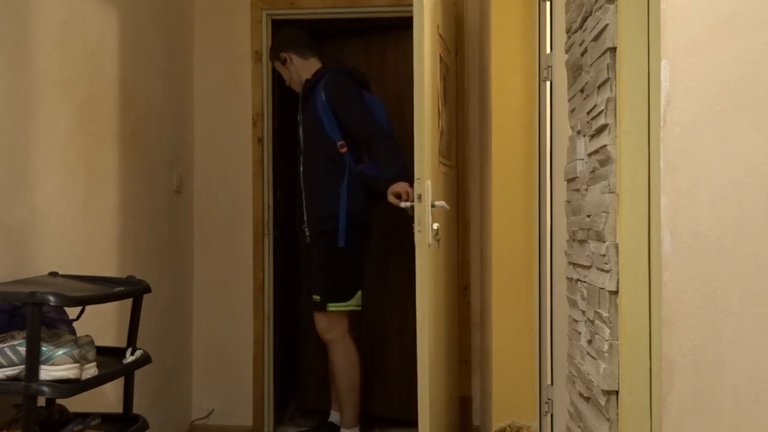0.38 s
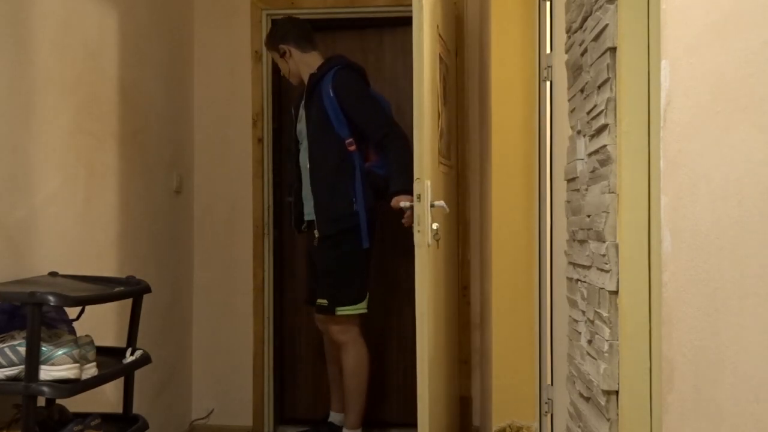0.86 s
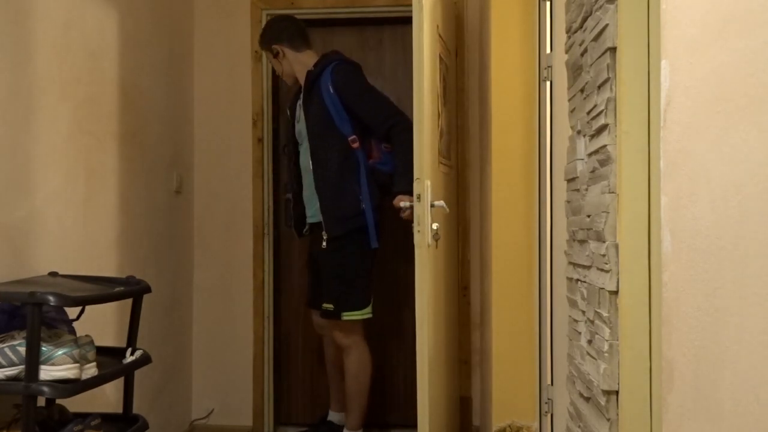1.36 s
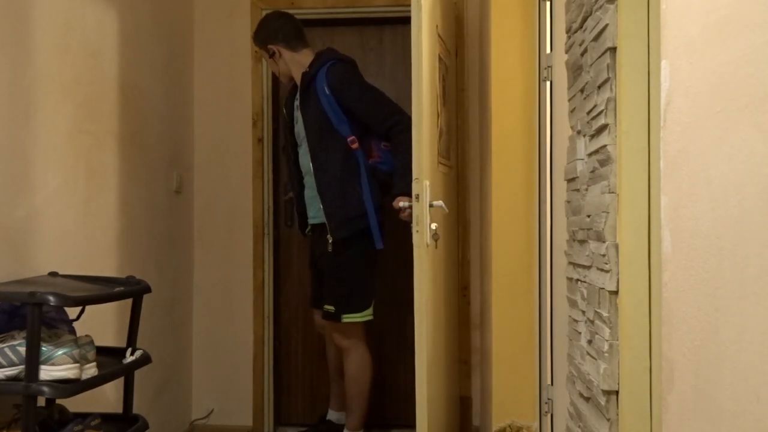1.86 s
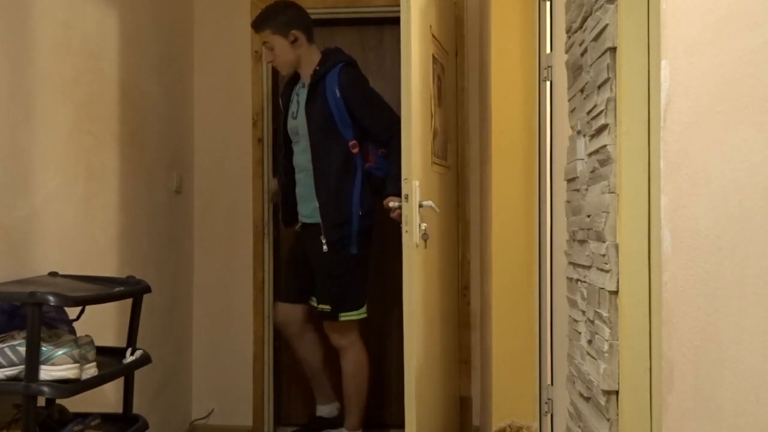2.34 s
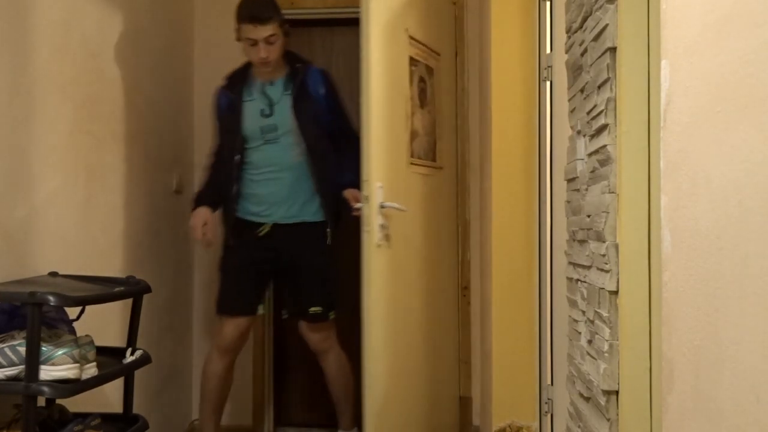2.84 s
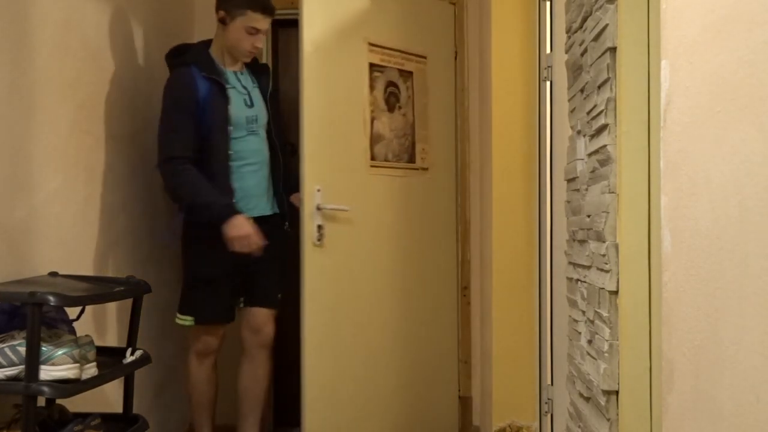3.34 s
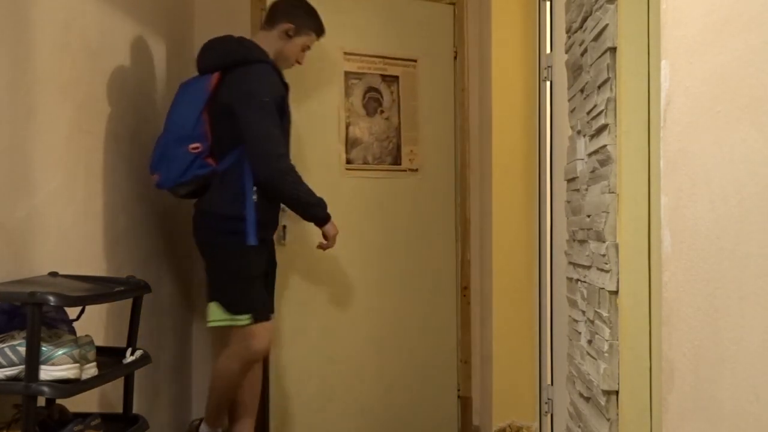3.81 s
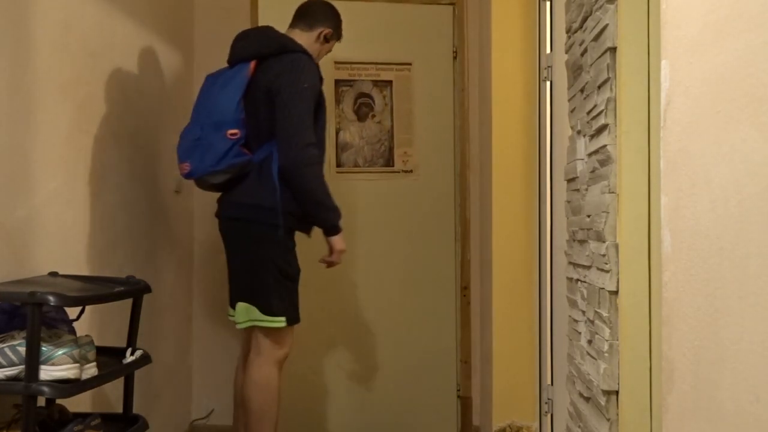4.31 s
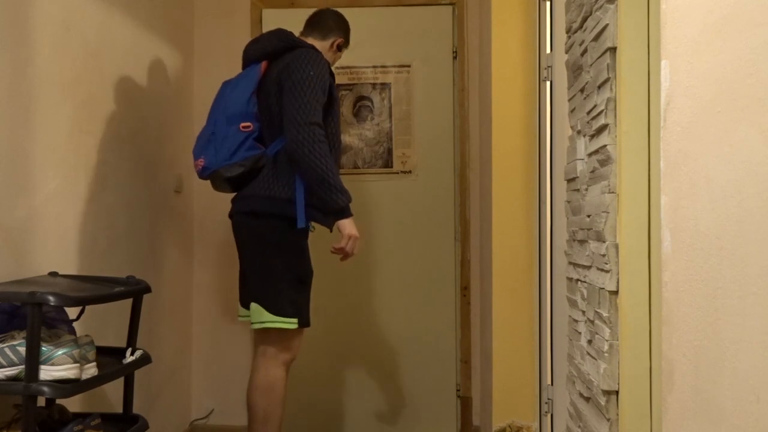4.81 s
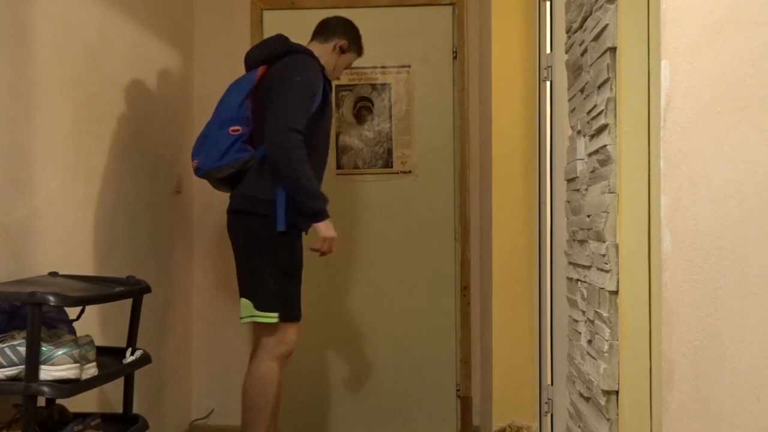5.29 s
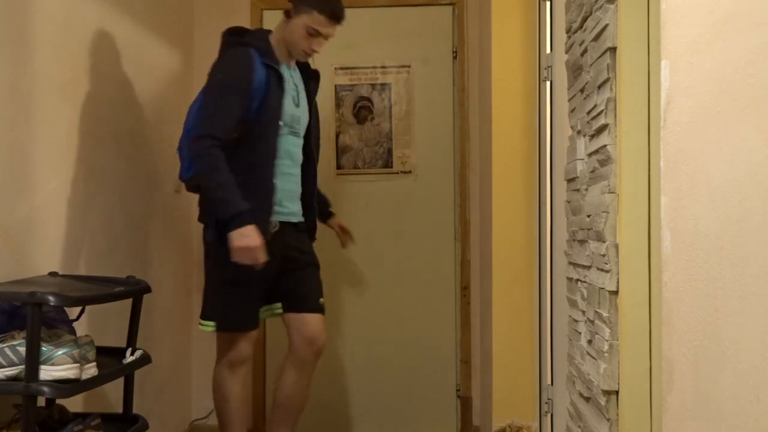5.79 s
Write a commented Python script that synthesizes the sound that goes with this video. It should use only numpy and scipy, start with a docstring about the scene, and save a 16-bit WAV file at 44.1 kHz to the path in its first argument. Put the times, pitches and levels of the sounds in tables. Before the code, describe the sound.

Someone enters through a door: soft handle clicks, one sharp metallic knock, cloth rustle, a duller closing thump, then small clicks and footfalls.

```python
"""Latch, handle and shoes knock in short rattles of tiny contacts, as someone steps into a hard-walled
entrance hall, works the handle and lock, and shuts the door. Metal drags ring the lock plate, a zip
tag tinkles as a struck set of modes, and wood groans as friction noise feeding a resonance.
Footfalls thud in the low modes of the hall, cloth and soles rustle as shaped noise over a smooth
hush, and dense decaying reflections smear the hits into a tail of up to half a second."""
import sys
import numpy as np
from scipy import signal
from scipy.io import wavfile

SR = 44100
rng = np.random.default_rng(int(sys.argv[2]) if len(sys.argv) > 2 else 0)


def amplitude_ratio(level_db):
    """Convert a level in decibels to the matching linear amplitude (field) ratio."""
    exponent = np.asarray(level_db, float) / 20
    return 10 ** exponent


def master_out(mix):
    """Clip the mix to full scale and print it as 16-bit PCM to the path in sys.argv[1]."""
    frames = np.transpose(np.atleast_2d(mix))
    ceiling = np.clip(frames, -1, 1)
    pcm = np.round(ceiling * 32767).astype(np.int16)
    wavfile.write(sys.argv[1], SR, pcm)


N = 261072

# half-octave band edges of the stereo noise: edge_hz
BAND_EDGES_HZ = 50 * 2 ** np.arange(0, 8.1, .5)
# reverberation time of the hall: frequency_hz, t60_s
HALL_T60 = [(150, 0.47), (400, 0.42), (1040, 0.54), (2760, 0.23), (7280, 0.3), (11000, 0.23)]
# correlation of left and right in diffuse sound: frequency_hz, likeness (-1 to 1)
LIKENESS = [(60, 0.34), (170, 0.99), (490, 0.9), (1400, 0.78), (4000, 0.4), (11400, -0.28)]
# spectrum of the room's hush: frequency_hz, relative density_db (per Hz)
HUSH_SPECTRUM = [(24, -71), (40, -51), (357, -8), (861, -4.5), (1020, 1), (1350, -2), (2280, 0),
                 (6060, -5.5), (11000, -14), (11800, -25), (15300, -55)]
# spectrum of rubbed cloth: frequency_hz, relative density_db (per Hz)
CLOTH_SPECTRUM = [(88, -40), (150, -11.5), (246, -6.5), (580, -2), (623, -0.5), (966, -3.5), (3410, -1),
                  (5480, -3.5), (6700, -6), (11800, -11), (15300, -57)]
# strokes of cloth, soles and door seal rubbing: start_s, hold_s, level_db, dull_part_relative_db
STROKES = [(0.014, 0.022, -55, -19), (0.062, 0.032, -47.5, 5), (0.16, 0.55, -50, -5),
           (0.793, 0.13, -59.5, -26), (1.583, 0.062, -55, -12), (1.708, 0.11, -38.5, -10),
           (1.789, 0.14, -38.5, -6.5), (2.025, 0.34, -49.5, -1.5), (2.39, 0.32, -54.5, -11),
           (2.865, 0.021, -51.5, -6), (2.959, 0.059, -50, -2.5), (3.12, .13, -56, -11),
           (3.322, .05, -65.5, 10.5), (3.408, 0.59, -55.5, -25), (3.762, 0.16, -51.5, -0.5),
           (4.068, 0.041, -48, -3.5), (4.21, 0.07, -55, -10), (4.336, 0.16, -54, -14),
           (4.476, 0.13, -48.5, -3), (4.69, 0.18, -54.5, 4.5), (5.114, 0.052, -54.5, 8.5),
           (5.296, 0.081, -52, -4.5), (5.517, 0.093, -52.5, -6.5), (5.717, 0.069, -53.5, -39)]
# low modes of hall and floor: name -> frequency_hz, t60_s, build_up_s (as a t60)
LOW_MODES = {"low": (103, 0.3, 0.18), "middle": (141, 0.43, 0.039), "high": (220, 0.3, 0.057)}
# footfalls and door weight in the floor: start_s, peak_db, mode_name, rumble_relative_db
THUDS = [(0.005, -85, "middle", -25), (0.1, -65.5, "high", -15), (0.498, -72, "middle", -10),
         (1.479, -70.5, "low", 2), (1.718, -61, "low", 4), (1.873, -61, "high", 2),
         (2.86, -78.5, "middle", -17), (2.91, -69, "high", -27), (3.724, -63, "middle", -20),
         (3.83, -71, "middle", -22), (3.941, -60, "middle", -15), (4.598, -73.5, "middle", -20),
         (4.739, -73, "middle", -20), (4.852, -64, "middle", -21), (5.124, -60, "middle", -4),
         (5.175, -58, "middle", -22), (5.391, -70, "middle", -16)]
# dull groans of the leaf and floorboards: start_s, level_db, pitch_hz, length_s, ringing_share (ratio)
GROANS = [(0.082, -57, 634, 0.11, 2.7), (0.128, -50, 272, 0.085, 0.37), (0.508, -49, 740, 0.035, 0.099),
          (0.601, -41, 1010, 0.015, 0.16), (1.51, -67, 340, 0.069, 1.6), (1.738, -64, 617, 0.084, .3),
          (1.875, -30, 666, 0.036, 1.5), (2.26, -39, 780, 0.03, 0.1), (2.275, -50, 370, 0.045, 0.1),
          (2.464, -48.5, 660, 0.024, 0.8), (2.56, -53, 723, 0.028, 0.5), (3.34, -64.5, 414, 0.051, 0.46),
          (3.717, -38, 539, 0.034, 0.19), (3.938, -47, 502, 0.024, 0.6), (4.174, -50, 520, 0.039, 0.35),
          (4.482, -50, 573, 0.043, 0.14), (4.595, -42.5, 742, 0.012, 0.69), (4.692, -46, 701, 0.031, 1.4),
          (4.835, -49, 545, 0.02, 0.56), (5.127, -47.5, 1166, 0.035, 0.2), (5.582, -55.5, 460, 0.036, 0.12)]
# modes of the zip tag: frequency_hz, relative level_db, t60_s
ZIP_TAG = [(5560, -6, 0.035), (5690, 0, 0.045), (5810, 3, 0.04), (6010, -5, 0.03)]
# zip tag touching its slider: start_s, relative level_db, top_mode_relative_db
TINKLES = [(3.171, -46, -6), (3.178, -53, 11), (3.197, -58, 2), (3.211, -55, 6), (3.981, -53, -18),
           (3.990, -45.5, -4), (4.001, -53, -10), (4.033, -45, -16), (4.043, -46, -16), (4.053, -49, -16),
           (4.064, -60, -16)]
# modes of the lock plate: frequency_hz, relative level_db, t60_s
LOCK_PLATE = [(1467, -17, 0.075), (1760, -20.5, 0.13), (1819, 6.5, 0.26), (2036, 8.5, 0.043),
              (2246, 2, 0.066), (2430, 13, 0.24), (2740, 6, 0.09), (3190, -6, 0.27)]
# modes of the lock case: frequency_hz, relative level_db, t60_s
LOCK_CASE = [(3854, 0, .012), (5093, -3, .012), (6223, -4, .012), (6900, -6, .012)]
# latch and key dragging over the lock: start_s, length_s, level_db, bright_part_relative_db
DRAGS = [(1.748, 0.035, -45.5, -1), (1.804, 0.044, -41, -1)]
# kinds of touch: name -> rise_s, rattle_time_constant_s, first_contact_share (ratio), grain_spread_db
TOUCHES = {"soft": (0.004, 0.013, 0.2, 4.5), "firm": (0.0028, 0.012, 0.7, 5.2),
           "crisp": (0.0015, 0.007, 1.2, 5)}
# knocks of latch, handle and shoes: start_s, relative level_db, clack_pitch_hz,
# snap_relative_db, hiss_relative_db, touch_name (firm where absent)
KNOCKS = [(0.052, -43, 2420, 2, -2, "soft"), (0.359, -47, 2750, 0, -31), (0.499, -39, 2430, 2.5, -46),
          (0.595, -40.5, 2870, -2, -10), (0.604, -33.5, 2380, -5.5, -17), (0.686, -50, 2470, -11, -22),
          (0.772, -53, 2130, -1, -8), (1.157, -55.5, 2700, -5, -15), (1.263, -55, 3360, -16, -30),
          (1.30, -54, 3400, -14, -30), (1.48, -39, 1920, -3, -17), (1.723, -32.5, 1840, -6, -33),
          (1.861, -36, 2400, -8, -20), (1.8675, -16.5, 1810, 3.5, -2.5, "soft"),
          (1.884, -17, 1980, -34, -1), (1.909, -19.5, 1790, -3, -39), (2.252, -35, 2400, -2.5, -12, "soft"),
          (2.282, -42, 2300, -8, -20), (2.372, -48, 1970, 6, 5), (2.417, -45, 2750, -6, -19, "crisp"),
          (2.861, -49.5, 2040, -3, -13, "soft"), (2.970, -53, 2240, -10, 1.5, "crisp"),
          (3.008, -47, 2000, -10, -23, "soft"), (3.085, -60, 2200, 9, -5, "crisp"),
          (3.0945, -44, 2210, 0, -6, "crisp"), (3.414, -52.5, 2280, -8, -18),
          (3.7105, -25, 1760, -14, -16.5, "soft"), (3.734, -32, 2220, 1, -8, "soft"),
          (3.878, -39.5, 2180, -6.5, -34, "soft"), (3.95, -60, 2250, 4, 10.5, "soft"),
          (4.088, -50, 2620, -7, -26), (4.101, -44.5, 2940, -9, -26), (4.183, -43, 2560, -8, -32),
          (4.488, -47.5, 2900, 2, -12, "soft"), (4.5813, -45, 2060, 0, -19), (4.633, -50, 2360, -24, -24),
          (4.695, -41, 1970, -15, -32, "soft"), (4.7166, -37, 1900, -12.5, -28, "crisp"),
          (4.757, -41, 2150, -22, -30, "crisp"), (4.794, -45, 2160, -22, -29), (4.830, -40, 2940, -1, -7),
          (5.127, -35, 2110, -5, -18, "soft"), (5.245, -45, 2460, -7.5, -22, "soft"),
          (5.319, -41, 2300, -6, -30, "soft"), (5.3245, -29, 2250, -5, -40, "crisp"),
          (5.377, -39.5, 2400, -4, -15), (5.5624, -31, 2530, -5, -18.5)]


def rms_one(x):
    """Normalization: scales a signal to an rms of 1."""
    return x / np.sqrt(np.mean(x ** 2) + 1e-20)


def at_hz(points, hz):
    """Interpolation: reads a table on a log-frequency axis."""
    table = np.array(points)
    return np.interp(np.log(hz), np.log(table[:, 0]), table[:, 1])


def band(x, low_hz, high_hz):
    """Band limitation: a Butterworth band-pass."""
    return signal.sosfilt(signal.butter(2, [low_hz, high_hz], "band", fs=SR, output="sos"), x)


def ring(x, hz, t60):
    """Damped resonance: a unit click sets a decaying sine of starting height 1 ringing."""
    radius, angle = amplitude_ratio(-60 / (t60 * SR)), 2 * np.pi * hz / SR
    return signal.lfilter([0, np.sin(angle)], [1, -2 * radius * np.cos(angle), radius ** 2], x + 1e-18)


def drift(rate_hz):
    """Random modulation: noise through two equal low-pass poles, with an rms of 1."""
    step = 40  # samples between the points of the slow signal
    pole = np.exp(-2 * np.pi * rate_hz * step / SR)
    white = rng.standard_normal(N // step + 502)
    slow = signal.lfilter([1], [1, -2 * pole, pole ** 2], white)[500:]
    return np.interp(np.arange(N) / step, np.arange(len(slow)), rms_one(slow))


def stereo_bands(size):
    """Diffuse-field correlation: half-octave noise whose left-right likeness varies with frequency."""
    white = rng.standard_normal((2, 2, size))
    for k, (low, high) in enumerate(zip(BAND_EDGES_HZ, BAND_EDGES_HZ[1:])):
        mid, side = band(white[k % 2], low, high)
        hz = np.sqrt(low * high)
        alike = np.clip(at_hz(LIKENESS, hz), -.99, .99)
        yield hz, np.sqrt(1 + alike) * mid + np.sqrt(1 - alike) * side * [[1], [-1]]


def struck(contacts, modes, spread_db, detune=0.012):
    """Modal excitation: contacts ring every mode, each with a chance strength and slight detuning."""
    total = 0
    for hz, db, t60 in modes:
        strength = amplitude_ratio(db + spread_db * rng.standard_normal())
        pitch = hz * (1 + detune * rng.standard_normal())
        total = total + strength * ring(contacts, pitch, t60)
    return total


def hall(x, size=30000):
    """Reverberation: dense reflections build up in a few ms and die band by band."""
    t = np.arange(size) / SR
    tail = sum(noise * amplitude_ratio(-60 * t / at_hz(HALL_T60, hz)) for hz, noise in stereo_bands(size))
    tail = tail * (1 - np.exp(-(t / 0.0012) ** 2))
    tail = np.sqrt(2) * tail / np.linalg.norm(tail)
    return signal.fftconvolve(x[None], tail, axes=1)[:, :N]


def rustle_and_hush(size=64):
    """Friction noise: rubbing flickers band by band under swelling strokes, over a smooth room hush."""
    attack_s, release_db_per_s, bright_db, hush_db = 0.03, 89, -5.5, -63
    start, hold, db, dull_db = np.transpose(STROKES)[:, :, None]
    coarse = np.arange(0, N + size, size)
    since = coarse / SR - start
    swell = np.sin(np.pi / 2 * np.clip(since / attack_s, 0, 1)) ** 2
    strokes = swell * amplitude_ratio(db - release_db_per_s * np.maximum(since - attack_s - hold, 0))
    rub = plain = hush = 0
    together = drift(22)
    for hz, noise in stereo_bands(N):
        tilt_db = dull_db * np.clip(np.log2(1200 / hz), 0, 1) + bright_db * np.clip(np.log2(hz / 3000), 0, 1)
        # overlapping strokes add in power
        gain = np.interp(np.arange(N), coarse, np.linalg.norm(strokes * amplitude_ratio(tilt_db), axis=0))
        flicker_db = .8 * together + 1.2 * drift(20)
        cloth = noise * amplitude_ratio(at_hz(CLOTH_SPECTRUM, hz) + flicker_db)
        rub, plain = rub + gain * cloth, plain + cloth
        # the same noise, reversed in time
        hush = hush + noise[:, ::-1] * amplitude_ratio(at_hz(HUSH_SPECTRUM, hz))
    return rub / np.std(plain) + amplitude_ratio(hush_db) * rms_one(hush)


def thuds(size=30000):
    """Room modes: a soft push of a few ms wakes one low mode and a short rumble in the floor."""
    out, t = np.zeros(N + size), np.arange(size) / SR
    push = band(t * np.exp(-t / .002), 70, 400)
    for s, db, mode, rumble_db in THUDS:
        hz, t60, build = LOW_MODES[mode]
        boom = ring(ring(ring(push, hz, t60), hz, build), hz, build)
        boom = boom / np.abs(boom).max()
        rumble = rms_one(band(rng.standard_normal(size), 26.8, 130))
        rumble = rumble * (1 - np.exp(-t / 0.01)) * amplitude_ratio(-60 * t / 0.41)
        at = round(s * SR)
        out[at:at + size] += amplitude_ratio(db) * (boom + amplitude_ratio(rumble_db) * rumble)
    return out[:N]


def groans(size=22000):
    """Friction-driven resonance: wood rubs wood, feeding a broad low band and a narrow ringing tone."""
    out, t = np.zeros(N + size), np.arange(size) / SR
    for s, db, hz, length, share in GROANS:
        stroke = t / length * np.exp(1 - t / length * 2)
        rub = band(rng.standard_normal(size), hz / 1.46, hz * 1.58) * stroke
        ringing = ring(rub, hz, 50 / hz)  # t60 of 50 cycles
        tone = rms_one(rub) + share * rms_one(ringing)
        at = round(s * SR)
        out[at:at + size] += amplitude_ratio(db) * rms_one(tone) * np.sqrt(np.mean(stroke ** 2))
    return out[:N]


def tinkles():
    """Modal ringing: each soft touch rings the thin tag; a square blow also wakes its top mode."""
    out = np.zeros(N)
    top_hz, top_level_db, top_t60_s = 8800, -14, .09
    for s, db, top_db in TINKLES:
        touch = amplitude_ratio(db - 4.5) * (np.arange(8000) == 0)
        body = band(struck(touch, ZIP_TAG, spread_db=2.0, detune=.005), 5500, 6100)
        top = amplitude_ratio(top_level_db + top_db) * ring(touch, top_hz, top_t60_s)
        at = round(s * SR)
        out[at:at + len(touch)] += body + top
    return out


def drags(size=12000):
    """Stick-slip contact: uneven ticks of metal on metal, growing along the stroke, ring the lock plate."""
    out, t = np.zeros(N + size), np.arange(size) / SR
    ticks_per_s, body_hz, bright_hz = 1100, (1440, 3240), (5440, 8000)
    for s, length, db, bright_db in DRAGS:
        ticks = (rng.random(size) < ticks_per_s / SR) * rng.standard_normal(size)
        ticks = ticks * amplitude_ratio(2.8 * rng.exponential(1, size).clip(0, 3))
        ticks = ticks * np.sqrt(np.clip(t / length, 0, 1)) * (t < length)
        body = band(band(ticks, *body_hz), *body_hz)
        plate = struck(body, LOCK_PLATE, spread_db=7.0)
        bright = band(ticks, *bright_hz)
        tone = rms_one(body) + .4 * rms_one(plate) + amplitude_ratio(bright_db) * rms_one(bright)
        at = round(s * SR)
        out[at:at + size] += amplitude_ratio(db) * np.sqrt(length * SR / size) * rms_one(tone)
    return out[:N]


def knocks(size=9000):
    """Impact: flurries of contacts clack in the lock plate, snap off the lock case and hiss on top.
    Row 0 is heard directly; row 1, the same energy as one blow, feeds the hall with an even colour."""
    out, t = np.zeros((2, N + size)), np.arange(size) / SR
    lead_s, first_blow_s = 0.002, 0.0028  # the first contact stands out of the rattle
    ring_share, width = 0.68, 1.29  # part of the clack gathered at its pitch; band edge over pitch
    plate_share, case_share = 0.26, 0.5
    for s, db, clack_hz, snap_db, hiss_db, *touch in KNOCKS:
        rise, rattle, first, grain_db = TOUCHES[touch[0] if touch else "firm"]
        grains = rng.standard_normal(size) * amplitude_ratio(grain_db * rng.exponential(1, size).clip(0, 4))
        shape = (1 - np.exp(-t / rise)) * np.exp(-t / rattle)
        flurry = grains * shape * np.linalg.norm(shape) / np.linalg.norm(grains * shape)
        blow_shape = (t > lead_s) * np.exp(-np.maximum(t - lead_s, 0) / first_blow_s)
        flurry = flurry + first * rng.standard_normal(size) * blow_shape
        single_blow = np.arange(size) == round((rise + .003) * SR)
        contact = np.stack([flurry, single_blow])

        def level(x):
            """Energy equality: gives each row the energy of the flurry."""
            return x * np.linalg.norm(flurry) / np.linalg.norm(x, axis=1, keepdims=True)

        wide = band(band(contact, 0.33 * clack_hz, 4550), 0.54 * clack_hz, 4130)
        pitched = band(wide, clack_hz / width, clack_hz * width)
        clack = level(level(wide) + ring_share * level(pitched))
        clack = level(clack + plate_share * level(struck(clack, LOCK_PLATE, spread_db=8.0)))
        bright = band(band(contact, 3400, 7600), 2800, 9000)
        snap = level(level(bright) + case_share * level(struck(bright, LOCK_CASE, spread_db=5.0)))
        hiss = level(band(contact, 7000, 10800))
        at = round((s - lead_s) * SR)
        out[:, at:at + size] += amplitude_ratio(db - 2.5) * (clack + amplitude_ratio(snap_db) * snap + amplitude_ratio(hiss_db) * hiss)
    return out[:, :N]


def microphones(x):
    """Interaural-like difference: bass reaches both ports alike, the rest gains a slightly late side part."""
    treble_side = 1.1 * np.roll(band(x, 5400, 9200), 9)  # samples late
    middle_side = 0.074 * np.roll(band(x, 550, 3800), 31)
    side = treble_side + middle_side
    return np.stack([x + side, x - side])


def scene():
    """Superposition: hits reach the microphones directly and through the hall."""
    hall_db, tag_hall_db, groan_hall_db, right_louder_db = 1.5, -12, -6, 0.75
    (direct, into_hall), tag, leaf, drag = knocks(), tinkles(), groans(), drags()
    # the tiny tag hardly stirs the hall, and the dull leaf feeds it less than metal does
    wet = hall(into_hall + drag + amplitude_ratio(tag_hall_db) * tag + amplitude_ratio(groan_hall_db) * leaf)
    near = microphones(direct + drag + tag + leaf)
    both = near + amplitude_ratio(hall_db) * wet + thuds() + rustle_and_hush()
    return both * amplitude_ratio(right_louder_db * np.array([[-.5], [.5]]))


def band_limit(x):
    """A steep low-pass at the top of the band."""
    return signal.sosfilt(signal.butter(12, 11850, fs=SR, output="sos"), x)


def record(dry):
    """Linear filtering: the microphones hear less in one narrow band, and the top is cut steeply."""
    dip_hz, dip_width_hz, dip_depth = 1287, 123, 0.35
    peak = signal.iirpeak(dip_hz, dip_hz / dip_width_hz, fs=SR)
    dipped = dry - dip_depth * signal.lfilter(*peak, dry)
    finished = signal.sosfilt(signal.cheby2(24, 70, 12030, fs=SR, output="sos"), dipped)
    return band_limit(finished)


dry = scene()
out = record(dry)
master_out(out)
```